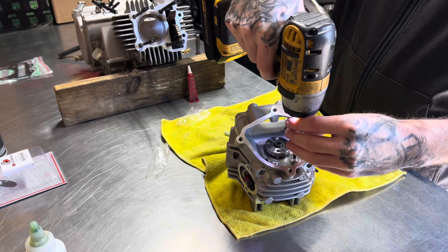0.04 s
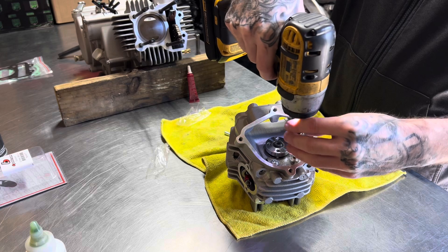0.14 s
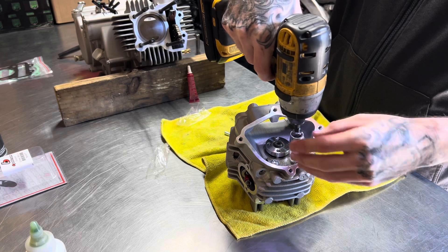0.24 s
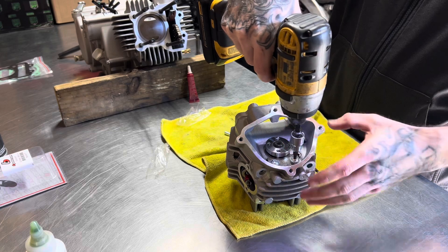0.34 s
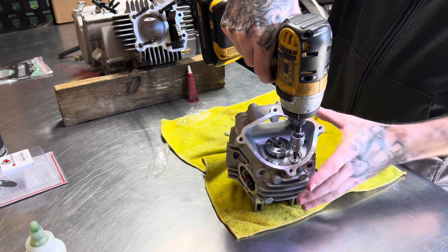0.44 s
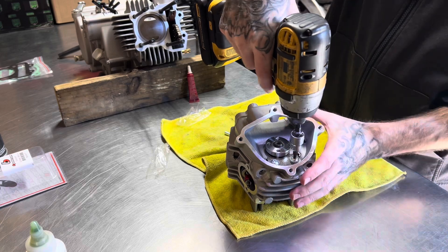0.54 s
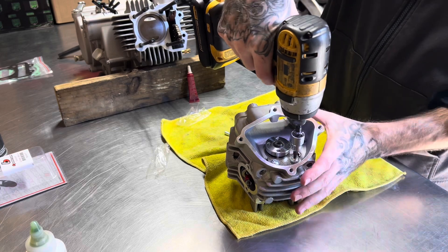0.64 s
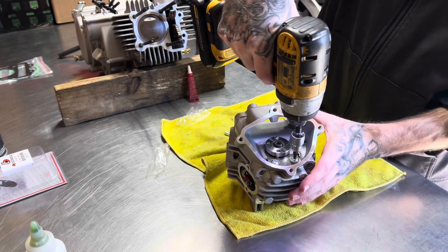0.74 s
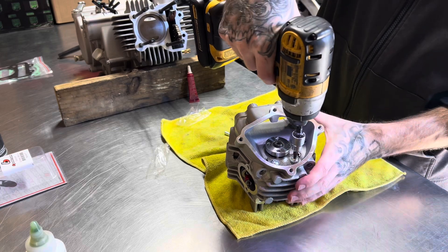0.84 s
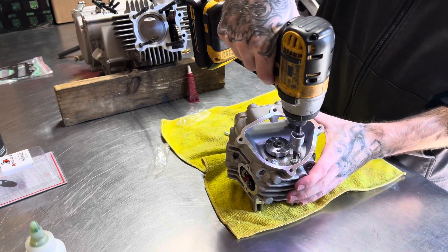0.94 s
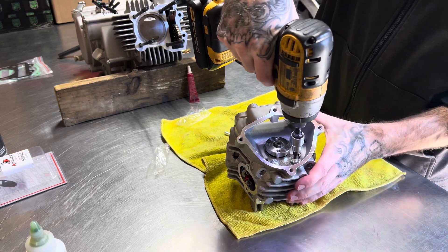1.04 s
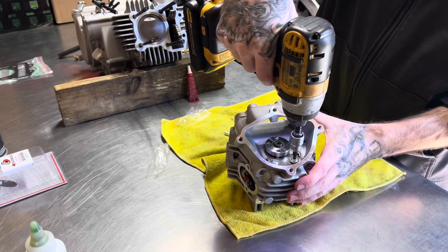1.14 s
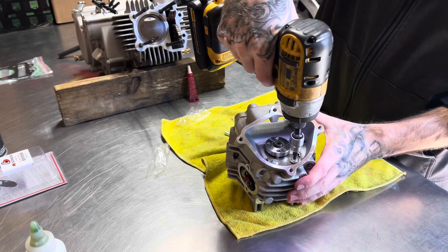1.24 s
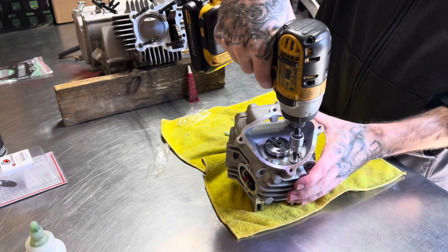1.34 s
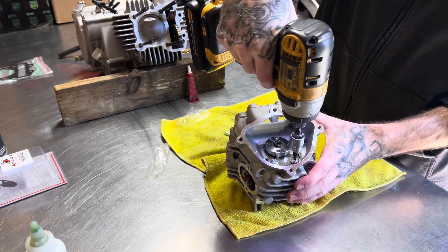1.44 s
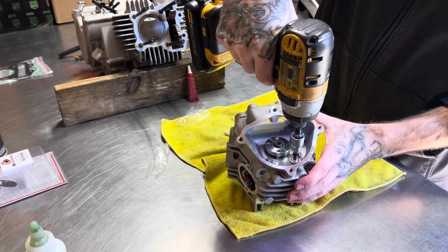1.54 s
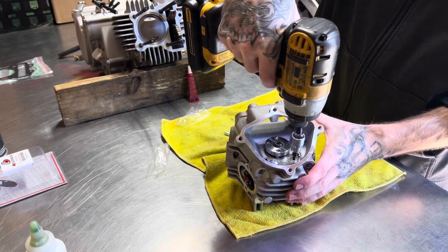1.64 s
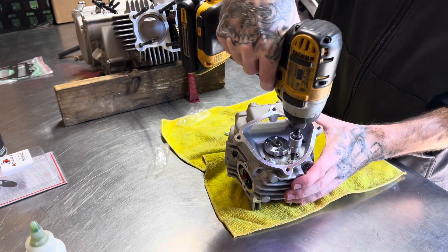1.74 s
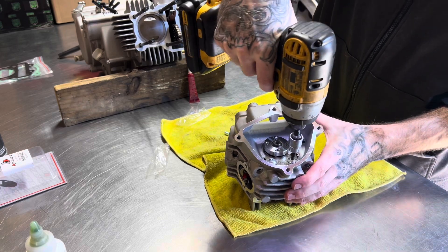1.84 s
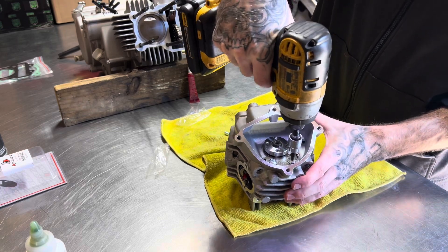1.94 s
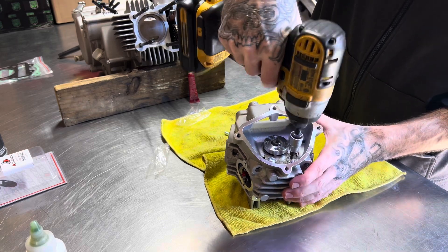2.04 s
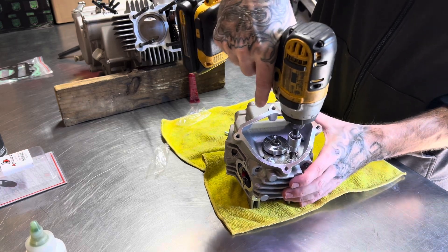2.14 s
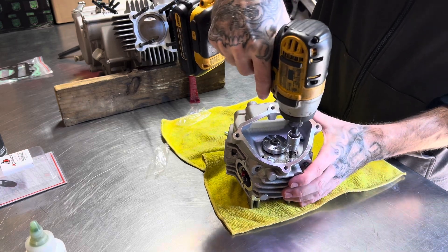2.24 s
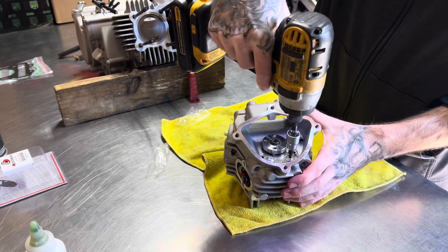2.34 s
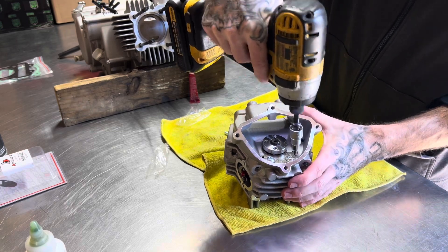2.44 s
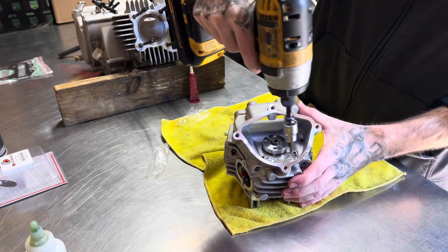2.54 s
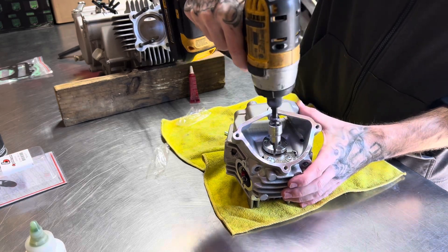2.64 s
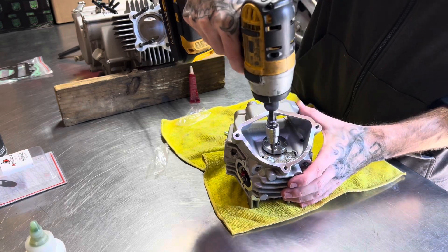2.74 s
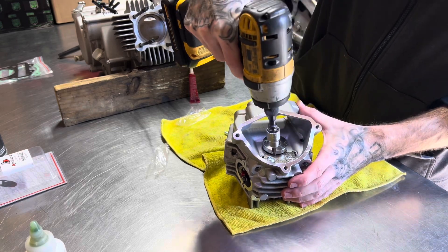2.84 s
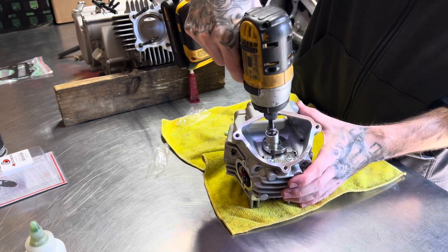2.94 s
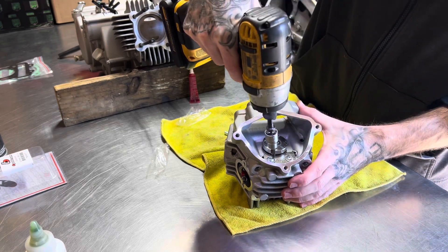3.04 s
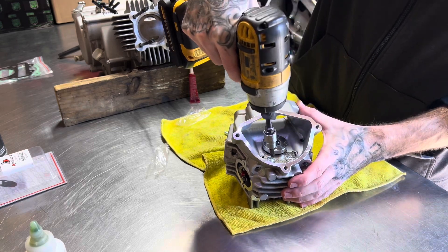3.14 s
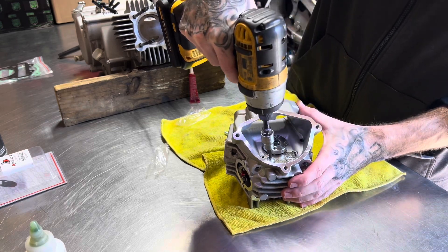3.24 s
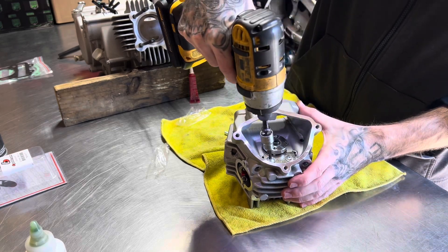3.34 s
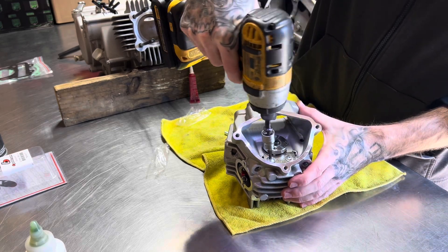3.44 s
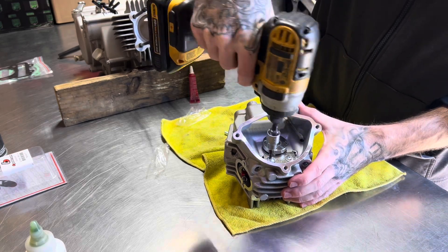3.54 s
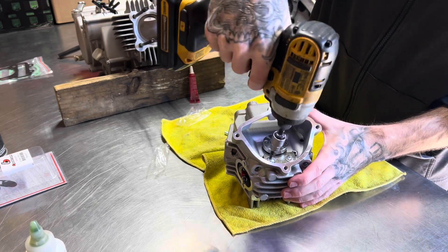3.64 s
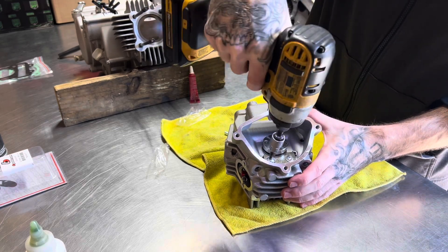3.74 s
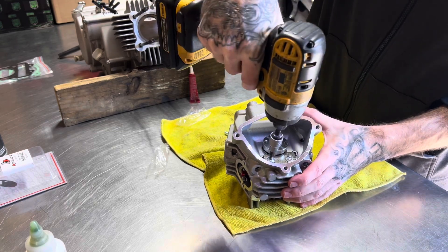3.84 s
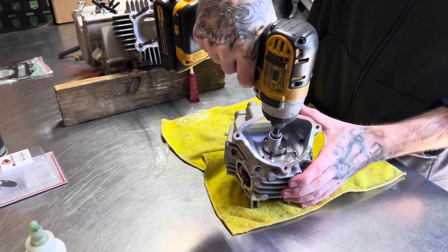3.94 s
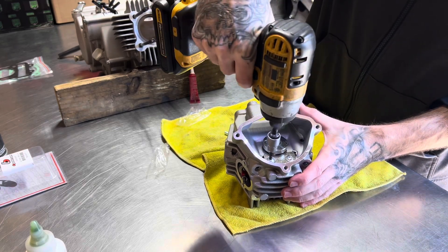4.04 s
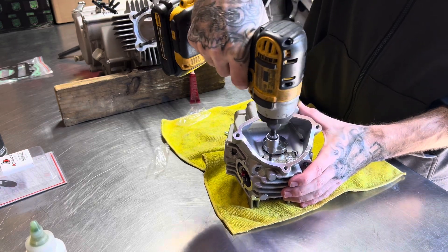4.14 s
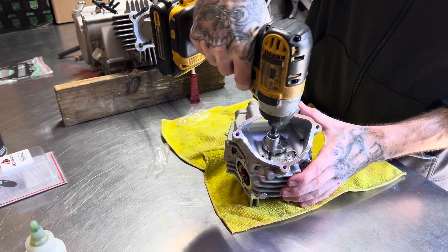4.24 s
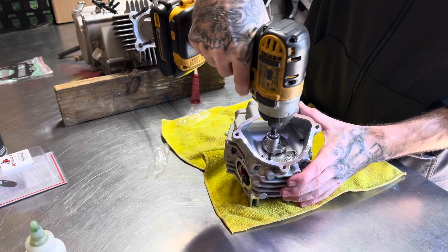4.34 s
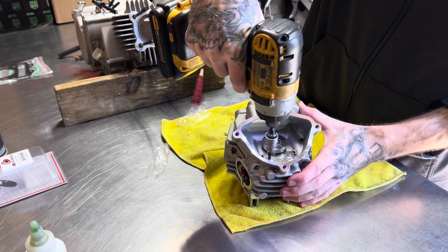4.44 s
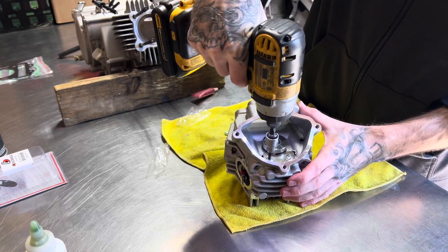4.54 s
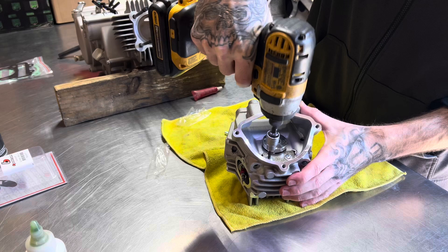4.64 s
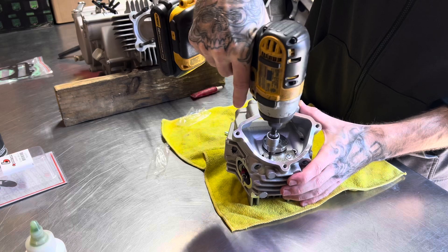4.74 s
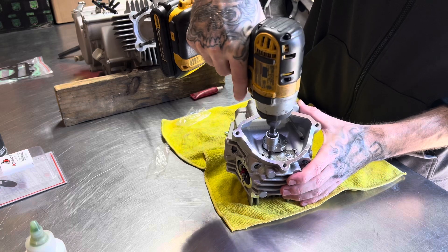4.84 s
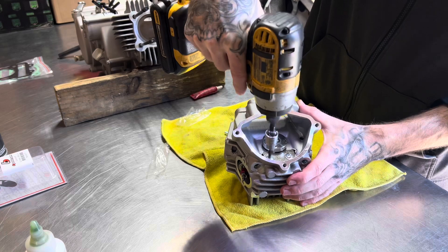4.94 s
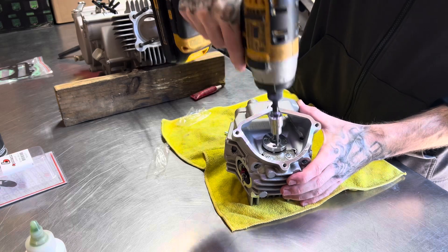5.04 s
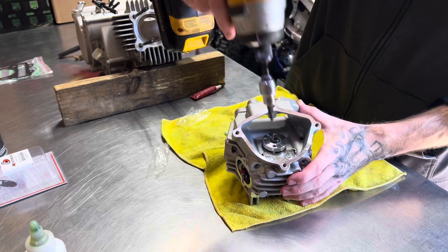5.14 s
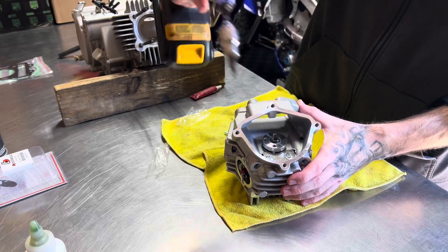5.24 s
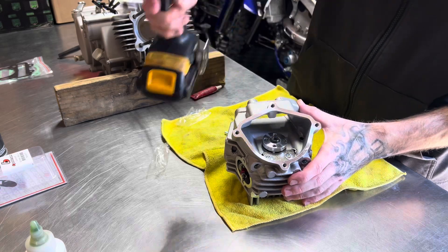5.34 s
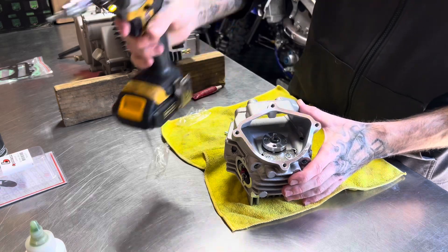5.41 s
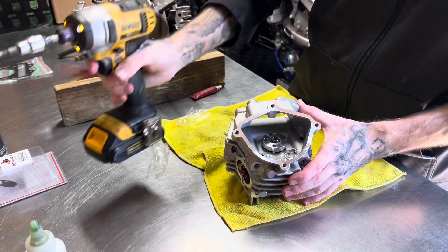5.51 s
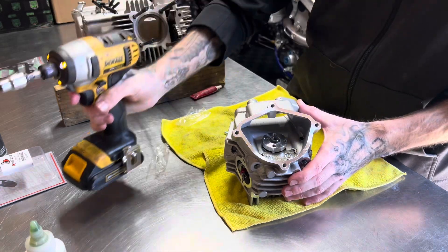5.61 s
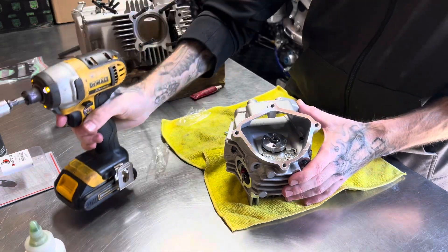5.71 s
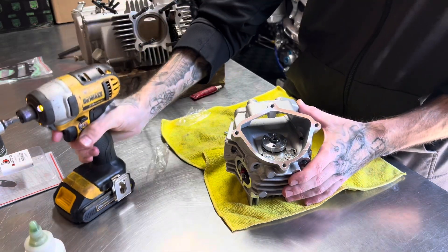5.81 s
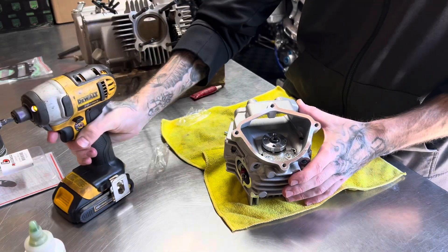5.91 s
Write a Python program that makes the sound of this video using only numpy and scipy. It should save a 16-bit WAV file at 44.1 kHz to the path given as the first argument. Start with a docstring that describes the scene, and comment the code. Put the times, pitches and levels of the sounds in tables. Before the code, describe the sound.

Brief, overloaded metallic hammering from a power driver alternates with quiet whirring, clicks and socket clinks, ending with a clacking set-down on a bench.

```python
"""On a steel-topped bench in a small workshop, a cordless impact driver runs small bolts into a cylinder head.
The motor creeps with a thin switching whine, made of sines, and rattling gears, made of coloured noise.
It speeds up, and the hammer strikes in four short bursts, noise and ringing modes that overload the microphone.
The socket clinks from bolt to bolt, and at last the tool is set down on the bench with thuds and clacks.
Soft air noise, a mains hum and a low rumble lie underneath."""
import sys
import numpy as np
from scipy import signal
from scipy.fft import rfft, irfft, next_fast_len
from scipy.io import wavfile
from scipy.ndimage import map_coordinates

SR = 44100
rng = np.random.default_rng(int(sys.argv[2]) if len(sys.argv) > 2 else 0)


def persist_wave(psi):
    """Save psi, clipped to +-1, as 16-bit WAV."""
    counts = np.round(np.clip(psi, -1, 1) * 32767).astype(np.int16)
    wavfile.write(sys.argv[1], SR, np.atleast_2d(counts).T)


N = 263276
T = np.arange(N) / SR  # time in the scene, seconds
AGE = np.arange(SR * 2 // 5) / SR  # time since a hit, seconds


def amp(db):
    """Turn decibels into a gain."""
    return 10 ** (np.asarray(db) / 20)


def unit(x):
    """Scale to an rms of 1."""
    return x / np.sqrt(np.mean(x ** 2) + 1e-20)


def along(points, hz):
    """Read between (Hz, value) points, on a logarithmic frequency axis."""
    f, v = np.transpose(points)
    return np.interp(np.log(hz + 1), np.log(f + 1), v)


def level(s, db):
    """A gain curve through points in seconds and dB, silent outside them."""
    return amp(np.interp(T, s, db, left=-200, right=-200))


def wobble(rate):
    """A smooth random curve through `rate` random points a second."""
    knots = rng.standard_normal(int(N * rate / SR) + 4)
    return map_coordinates(knots, [T * rate])


def swell(s, width):
    """A smooth bump of height 1 around time s."""
    return np.exp(-((T - s) / width) ** 2)


def decay(seconds, t60):
    """Exponential decay that falls 60 dB in t60 seconds."""
    return np.exp(-np.log(1000) * seconds / t60)


def burst(t60):
    """A puff of noise that swells as the contact closes, then dies."""
    swelling = 1 - np.exp(-(AGE / .0008) ** 2)
    return rng.standard_normal(len(AGE)) * decay(AGE, t60) * swelling


def ring(modes):
    """A struck body: its modes ring at new strengths and phases with every hit."""
    total = np.zeros(len(AGE))
    for hz, db, t60 in modes:
        strength = amp(db + 2 * rng.standard_normal())
        total += strength * decay(AGE, t60) * np.sin(2 * np.pi * (hz * AGE + rng.random()))
    return total * (1 - np.exp(-AGE / 0.0011))


def add(track, s, sound):
    """Mix a sound into the track at time s."""
    start = max(round(s * SR), 0)
    track[start:start + len(sound)] += sound[:N - start]


def coloured(x, spectrum, peaks=(), lift_db=0):
    """Causal filter of unit power: a broad spectrum with resonances standing out of it."""
    size = 2 * next_fast_len(N // 2 + SR // 2)
    hz = np.fft.rfftfreq(size, 1 / SR)
    resonances = sum(amp(lift_db + db / 2) / (1 + (2 * (hz - f) / width) ** 2) for f, width, db in peaks)
    gain = amp(along(spectrum, hz)) * (1 + resonances)
    # folding the cepstrum gives minimum phase, so nothing sounds before the hit
    cepstrum = irfft(np.log(np.maximum(unit(gain), 1e-6)))
    cepstrum[1:size // 2] *= 2
    cepstrum[size // 2 + 1:] = 0
    return irfft(rfft(x, size) * np.exp(rfft(cepstrum)), size)[:N]


# Bursts of hammering. Each row: first blow in seconds, wait for the second blow in seconds, number of blows.
BURSTS = [(1.594, .0205, 2), (1.9498, .0305, 6), (4.1362, .036, 3), (4.553, .0303, 6)]
BEAT_S, SLOWING_S = .02, .0017  # time between later blows, and its growth per blow as the bolt tightens
BLOW_DB, LAST_BLOW_DB = 4.3, -10  # strength of a blow; change for the last, as the trigger lets go


def full_blows():
    """Time and dB of each blow: the motor winds up again after the first, then beats a little slower each time."""
    blows = []
    for first, wait, count in BURSTS:
        gaps = [0, wait] + [BEAT_S + SLOWING_S * k for k in range(count - 2)]
        for k, s in enumerate(first + np.cumsum(gaps)):
            is_last = k == count - 1
            blows.append((s, BLOW_DB + LAST_BLOW_DB * is_last))
    return blows


# The hammer rides over the lugs without catching. The row: start in seconds, end in seconds, strength in dB.
RATCHET = (4.69, 4.725, -10)
REBOUND_S, REBOUND_LOSS_DB = .0054, 2.5  # the hammer bounces on the anvil after each blow
GRAZE_DB = -6  # it grazes a lug one bounce before the first blow
SCATTER_S, SCATTER_DB = .0006, 1.4  # how much the glancing blows vary


def glancing_blows(count=3, size=7):
    """Time and dB of light contacts: a graze before each burst, `count` rebounds a blow, `size` ratchet ticks."""
    grazes = [(s - REBOUND_S, GRAZE_DB) for s, _, _ in BURSTS]
    rebounds = [(s + k * REBOUND_S, db - k * REBOUND_LOSS_DB)
                for s, db in full_blows() for k in range(1, count + 1)]
    start, end, ratchet_db = RATCHET
    ticks = [(s, ratchet_db) for s in np.linspace(start, end, size)]
    hits = np.array(grazes + rebounds + ticks)
    return hits + rng.standard_normal(hits.shape) * [SCATTER_S, SCATTER_DB]


# Resonances of anvil, socket and casting. Each row: pitch in Hz, width in Hz,
# prominence in dB (the filter uses half of it, plus a common lift).
HEAD = [(530, 45, 0), (730, 50, -3), (1453, 70, -6), (1680, 80, -7), (1926, 80, -5), (3150, 140, -7),
        (3425, 130, -1), (3930, 140, 0), (4930, 90, -2), (6250, 130, 0), (6795, 130, -3), (7600, 150, -6)]
# Broad colour of steel striking steel. Each row: frequency in Hz, relative level in dB.
STRIKE = [(30, -13.5), (70, -7.5), (130, 1.5), (250, -1), (550, -1), (950, -7.5), (1600, -4), (2700, -2.5),
          (3600, -4), (4700, -7), (6300, -5.5), (8500, -5), (11000, -9), (15500, -17.5)]
# Range of the extra clanging modes: lowest in Hz, highest in Hz.
CLANG_HZ = (900, 9000)
BLOW_T60, GLANCE_T60 = .036, .021  # seconds for a full or a glancing blow to fall 60 dB
PRESSED = .6  # share of its ring time that the bench keeps while the tool bears down on it


def hammer(glance_db=0, shake_db=-23, clang_db=-10.5, lift_db=-3.0):
    """Steel strikes steel: each blow chatters through anvil, socket and casting and shakes the bench."""
    chatter, shake = np.zeros(N), np.zeros(N)
    damped = [(hz, db, PRESSED * t60) for hz, db, t60 in BENCH]
    clang_pitches = np.geomspace(*CLANG_HZ, num=50)
    kinds = [(full_blows(), 0, BLOW_T60), (glancing_blows(), glance_db, GLANCE_T60)]
    for hits, gain_db, t60 in kinds:
        for s, db in hits:
            # the socket sits differently on the bolt at each blow, so other short modes clang
            seat = [(hz, clang_db, t60) for hz in clang_pitches[rng.integers(50, size=6)]]
            contact = (burst(t60) + ring(seat)) / np.sqrt(2)
            add(chatter, s, amp(db + gain_db) * contact)
            add(shake, s, amp(db + gain_db + shake_db) * ring(damped))
    return coloured(chatter, STRIKE, HEAD, lift_db) + shake


# Trigger pulls. Each row: start in seconds, release in seconds, spin-up time in seconds,
# then relative strengths in dB of the gear rattle, the switching whine and the clack of gears taking up.
PULLS = [(-.2, 0.253, 0.049, -53, -55, -58.5), (0.82, 1.248, 0.035, -49, -46.5, -35),
         (1.489, 1.6, .014, -32.5, -43.5, -34), (1.908, 2.07, 0.015, -31.5, -40, -21),
         (3.9, 4.165, 0.038, -33.5, -33.5, -30), (4.511, 4.689, 0.01, -32.5, -40, -16.5)]
# Tight spots in the thread make the motor work harder.
# Each row: middle in seconds, half length in seconds, extra level in dB.
TIGHT_SPOTS = [(0.156, 0.036, 3), (0.943, 0.051, 6), (1.024, 0.031, 6), (1.234, 0.029, 3.5)]
SEAT_S, SEAT_DB = 0.021, 9.5  # the load climbs as the bolt head seats, around the first blow of a burst
GEAR_RISE_DB, WHINE_RISE_DB = 24, 8  # gained during spin-up
COAST_S, CUT_S = .042, .006  # after release the gears coast and the current dies


def drive():
    """Gains of rattle and whine: each pull spins up, holds and runs out; both grow with the load."""
    rattle, whine = np.zeros(N), np.zeros(N)
    for start, release, spin_up, rattle_db, tone_db, _ in PULLS:
        lag = np.exp(-np.maximum(T - start, 0) / spin_up)
        off = np.maximum(T - release, 0)
        rattle += (T > start) * amp(rattle_db - GEAR_RISE_DB * lag) * np.exp(-(off / COAST_S) ** 2)
        whine += (T > start) * amp(tone_db - WHINE_RISE_DB * lag) * np.exp(-off / CUT_S)
    tight_db = sum(db * swell(s, width) for s, width, db in TIGHT_SPOTS)
    seating_db = sum(SEAT_DB * swell(s, SEAT_S) for s, _, _ in BURSTS)
    load = amp(tight_db + seating_db)
    return rattle * load, whine * load


# Colour of the gears running fast. Each row: frequency in Hz, relative level in dB.
GEARS = [(150, -2), (350, -6), (520, -2), (900, -4), (1500, -1.5), (3200, -2), (5000, -3.5), (8200, 0),
         (10000, -11), (13000, -13.5), (15500, -18)]
# Colour of the gears running slowly. Each row: frequency in Hz, relative level in dB.
SLOW_GEARS = [(150, -11), (400, -11.5), (550, -4), (1000, -7.5), (1700, 3.5), (2500, -2.5), (3500, 6),
              (5000, 1), (8500, -6), (11000, -21.5), (15500, -23)]
COG_HZ, COG_DB = 176, 2.5  # slow gears rattle in pulses, tooth by tooth
WHINE_HZ = 3922.5  # switching rate of the speed control


def motor(whine_db=-1, octave_db=-1, third_db=-15, gear_db=3.5, rough_db=3.5, fast_db=-44, ripple=0.31):
    """The speed control whines at its switching rate; the gears rattle, brighter when they run fast."""
    rattle, whine = drive()
    teeth = unit(rng.standard_normal(N) * amp(rough_db * np.tanh(wobble(700))))
    cogging = amp(COG_DB * np.cos(2 * np.pi * COG_HZ * T + 2 * wobble(20)))
    fast = rattle / (rattle + amp(fast_db))
    fast_gears = fast * coloured(teeth, GEARS)
    slow_gears = (1 - fast) * coloured(unit(teeth * cogging), SLOW_GEARS)
    gears = rattle * amp(gear_db) * (fast_gears + slow_gears)
    # short switching pulses at a light trigger are richer in overtones
    light = 1 / (1 + whine / amp(-51))
    phase = 2 * np.pi * WHINE_HZ * T + 0.22 * wobble(170)
    overtones = amp(octave_db) * np.sin(2 * phase) + amp(third_db) * np.sin(3 * phase + wobble(290))
    # the current ripples as the rotor turns
    current = whine * (1 + ripple * wobble(450))
    tone = np.sin(phase) + 2 * light * overtones
    return gears + np.sqrt(2) * amp(whine_db) * current * tone


# The gear mesh as the motor runs up: one list for each run-up.
# Each row: time in seconds, pitch in Hz, rms level of the fundamental in dB.
RUN_UPS = [
    [(1.515, 783.6, -46.5), (1.528, 963, -42), (1.548, 1350, -40.5), (1.565, 1537, -40),
     (1.59, 1530, -34.5), (1.62, 1260, -59.5)],
    [(3.96, 590, -66.5), (4.02, 799, -51), (4.055, 947, -50), (4.11, 1140, -50.5), (4.13, 1060, -56.5)],
]


def gear_mesh(octave_db=-5):
    """A rough tone and its octave climb as the bolt spins in freely, then sag at the end."""
    out = np.zeros(N)
    for run in RUN_UPS:
        s, hz, db = np.transpose(run)
        turns = np.cumsum(np.interp(T, s, hz)) / SR
        phase = 2 * np.pi * turns + .3 * wobble(250)
        tone = np.sin(phase) + amp(octave_db) * np.sin(2 * phase)
        out += np.sqrt(2) * level(s, db) * tone
    return out


# Dry clicks of trigger, chuck and gear play.
# Each row: time in seconds, strength in dB, extra treble in dB.
CLICKS = [(0.388, -37.5, -27), (.4528, -50, -24), (0.5234, -37.5, -8), (0.6404, -44, -10),
          (0.748, -52.5, 2), (1.2904, -34.5, 8), (1.677, -27.5, 9.5), (1.6966, -22, -20),
          (1.732, -33.5, -1), (1.7843, -45, 4), (1.8682, -36, -12), (2.3903, -36, -10),
          (2.9348, -32.5, -29.5), (3.473, -34, -4), (3.697, -43.5, -15.5), (3.782, -47, -17.5),
          (3.9347, -12.5, 1.5), (4.2574, -21.5, -16), (4.312, -30, -13.5), (4.415, -39, -7),
          (4.4368, -38, -2.5), (4.4719, -33.5, -13.5), (5.198, -51.5, -26), (5.8474, -31, 5.5)]
# Dull part of a click. Each row: frequency in Hz, relative level in dB.
KNOCK = [(300, -11.5), (900, -7.5), (1500, -2), (2600, -3.5), (4500, -11.5), (8000, -20.5)]
# Treble part of a click. Each row: frequency in Hz, relative level in dB.
SNAP = [(2500, -23.5), (6000, 4), (10000, -3), (15500, -9.5)]
TAKE_UP_S = 0.0063  # the gear play closes this long after the trigger is pulled


def clicks(knock_db=-5, snap_db=-4, take_up_treble_db=-2, fidget_db=-69, count=45):
    """Plastic and loose gears click without ringing; fingers add tiny ticks at random."""
    knock, snap = np.zeros(N), np.zeros(N)
    take_ups = [(start + TAKE_UP_S, db, take_up_treble_db) for start, *_, db in PULLS if start > 0]
    for s, db, treble_db in CLICKS + take_ups:
        add(knock, s, amp(db + knock_db) * burst(t60=.02))
        add(snap, s, amp(db + treble_db + snap_db) * burst(t60=0.011))
    for when, size in rng.random((count, 2)):
        add(knock, when * N / SR, amp(fidget_db + 10 * size ** 2) * burst(t60=0.023))
    return coloured(knock, KNOCK) + coloured(snap, SNAP)


# The socket meets or leaves a bolt head. Each row: time in seconds, strength in dB, extra ring in dB.
CLINKS = [(2.2417, -32.5, -0.5), (2.2652, -23.5, -16), (2.9037, -40.5, 4.5), (2.9624, -54, -4.5),
          (3.166, -42.5, 5.5), (3.2075, -60, 2.5), (3.5048, -28, -0.5), (3.5069, -19.5, -9.5),
          (4.8822, -29, -21), (4.9022, -31.5, -15)]
# Ringing modes of the socket. Each row: pitch in Hz, relative level in dB, seconds to fall 60 dB.
SOCKET = [(3340, -17, 0.19), (3900, -20, 0.12), (5100, -21, 0.11), (6220, 2, 0.021), (6600, 6.5, 0.047),
          (7000, -25, 0.036), (6920, 0, 0.02), (8400, -10, 0.074), (9760, -23, 0.054)]


def clinks(tick_db=-3, ring_db=-14):
    """The socket ticks against a bolt, rebounds once and rings briefly."""
    tick, tone = np.zeros(N), np.zeros(N)
    for s, db, free_db in CLINKS:
        add(tick, s, amp(db + tick_db) * burst(t60=0.015))
        rebound_s = s + rng.uniform(.004, 0.016)
        add(tick, rebound_s, amp(db + tick_db - 14.5) * burst(t60=0.031))
        add(tone, s, amp(db + free_db + ring_db) * ring(SOCKET))
    # colour of the tick: Hz, relative dB
    tick_colour = [(400, 5), (1400, 9.0), (4500, 2.5), (6500, -4.0), (10000, 6.0), (15000, -13.5)]
    return coloured(tick, tick_colour) + tone


# Modes of the bench top. Each row: pitch in Hz, relative level in dB,
# seconds to fall 60 dB when the tool is not hammering.
BENCH = [(88, -8, .2), (106, -5, .22), (124, 0, .3), (138, -2, .2), (172, -7, .22), (237, -15, .25),
         (318, -15, .16), (368, -15, .22), (479, -17, .13), (531, -18, .16)]
# Pushes that pass through the cloth into the bench. Each row: time in seconds, strength in dB.
THUMPS = [(0.524, -39), (0.942, -28.5), (1.697, -32), (2.265, -40.5), (3.515, -24), (3.539, -27.5),
          (3.937, -19), (4.892, -35.5)]
# The battery lands and rocks on the bench. Each row: time in seconds, strength in dB, extra clack in dB.
LANDINGS = [(5.7765, -10.5, -6.5), (5.788, -14.5, -8.5), (5.813, -20.5, -8), (5.8818, -26.5, -29)]
# The battery slides to rest. Each row: time in seconds, rms level in dB before a random flutter's swing.
SLIDE = [(5.83, -58), (5.89, -63.5), (5.93, -74), (5.97, -63.5)]
# Colour of a push. Each row: frequency in Hz, relative level in dB.
PUSH = [(15, -6.5), (40, 1), (90, -4.5), (220, -16), (550, -15.5), (1000, -30), (2500, -44)]
# Colour of the landing's thud. Each row: frequency in Hz, relative level in dB.
THUD = [(15, -40), (25, -3), (210, 2), (280, -5), (357, -4), (456, -8.5), (887, -5.5), (969, -11),
        (1130, -10), (1240, -8), (5000, -40.5), (6500, -57.5), (11000, -120)]
# Colour of the landing's clack and of the slide. Each row: frequency in Hz, relative level in dB.
CLACK = [(600, -23.5), (1500, -2), (3000, -6.5), (6000, -11.5), (10000, -12.5), (15500, -32)]


def bench(push_db=-10, bump_db=-7, thud_db=-5.5, thud_t60=0.15, clack_db=-9, clack_t60=0.14, top_db=-20):
    """The bench top booms under pushes, and under the battery when the tool is set down and slides."""
    boom, push, thud = np.zeros(N), np.zeros(N), np.zeros(N)
    scrape = unit(rng.standard_normal(N) * amp(11.0 * wobble(250)))
    clack = level(*np.transpose(SLIDE)) * scrape
    for s, db in THUMPS:
        add(boom, s, amp(db + push_db) * ring(BENCH))
        add(push, s, amp(db + bump_db) * burst(t60=0.13))
    for s, db, hard_db in LANDINGS:
        add(boom, s, amp(db + top_db) * ring(BENCH))
        add(thud, s, amp(db + thud_db) * burst(thud_t60))
        add(clack, s, amp(db + hard_db + clack_db) * burst(clack_t60))
    return boom + coloured(push, PUSH) + coloured(thud, THUD) + coloured(clack, CLACK)


# The casting rings on faintly after a burst, in a mode that depends on the bolt.
# Each row: start in seconds, pitch in Hz, peak level in dB.
AFTER_RINGS = [(1.6, 531, -52), (1.62, 668, -55), (2.07, 531, -50), (4.19, 668, -43), (4.72, 668, -53)]


def casting(t60=1.0):
    """A faint tone hangs in the cylinder head once the hammer stops: decaying sines."""
    out = np.zeros(N)
    for s, hz, db in AFTER_RINGS:
        tone = np.sin(2 * np.pi * hz * (T - s))
        out += amp(db) * (T > s) * decay(np.abs(T - s), t60) * tone
    return out


# How long the workshop echoes. Each row: frequency in Hz, seconds to fall 60 dB.
ROOM = [(100, 0.51), (300, 0.26), (700, 0.27), (2000, 0.17), (5000, 0.19), (13000, 0.13)]


def room(x, build=0.0044):
    """The workshop's short echo, decaying noise renewed every half second as the tool and hands move."""
    out = np.zeros(N)
    for start in range(0, N, SR // 2):
        hz, t, z = signal.stft(rng.standard_normal(len(AGE)), SR, nperseg=256)
        faded = z * decay(t, along(ROOM, hz)[:, None])
        tail = signal.istft(faded, SR, nperseg=256)[1][:len(AGE)]
        tail = tail * (1 - np.exp(-AGE / build))
        echo = signal.fftconvolve(x[start:start + SR // 2], tail / np.linalg.norm(tail))
        add(out, start / SR, echo)
    return out


# Colour of the workshop air. Each row: frequency in Hz, relative level in dB.
AIR = [(15, -41), (25, -7), (48, -15), (122, -3), (198, -20), (233, -18), (399, -19.5), (537, -17),
       (582, -30.5), (648, -23), (1850, -33.5), (2120, -42), (2490, -40.5), (15500, -51.5)]
# Colour of the low rumble. Each row: frequency in Hz, relative level in dB.
RUMBLE = [(15, -7), (32, 4.5), (70, -6.5), (130, -16), (300, -32.5), (900, -82)]


def background(air_db=-62, hum_db=-67, rest_db=-65, push_sway_db=-25, blow_sway_db=-53,
               landing_sway_db=-38, sway_t60=2.2):
    """Workshop air, a wavering mains hum, and a low rumble of the bench that every jolt stirs up."""
    jolts = [(s, db + push_sway_db) for s, db in THUMPS]
    jolts += [(s, db + blow_sway_db) for s, db in full_blows()]
    jolts += [(s, db + landing_sway_db) for s, db, _ in LANDINGS]
    power = amp(rest_db) ** 2
    for s, db in jolts:
        power = power + (T > s) * (amp(db) * decay(np.abs(T - s), sway_t60)) ** 2
    rumble = np.sqrt(power) * coloured(rng.standard_normal(N), RUMBLE)
    hum = amp(hum_db + 2 * wobble(2.8)) * np.sin(2 * np.pi * 120 * T + .5 * wobble(2.3))
    air = amp(air_db + wobble(2)) * coloured(rng.standard_normal(N), AIR)
    return rumble + hum + air


def scene(blow_room_db=-14, room_db=-11):
    """Tool and bench close by, in a small workshop."""
    blows = hammer()
    rest = motor() + gear_mesh() + clicks() + clinks() + bench()
    echo = room(amp(blow_room_db) * blows + amp(room_db) * rest)
    return (blows + rest + echo + casting() + background())[None]


TOP_HZ = 15800  # band limit of the microphone signal


def record(dry):
    """The hammer blows overload the input, which rounds off peaks; nothing passes above the band limit."""
    clipped = dry / (1 + np.abs(dry / .92) ** 5) ** (1 / 5)
    size = next_fast_len(N + SR // 2)
    passband = np.clip((TOP_HZ - np.fft.rfftfreq(size, 1 / SR)) / 100, 0, 1)
    return irfft(rfft(clipped, size) * passband, size)[:, :N]


dry = scene()
out = record(dry)
persist_wave(out)
```